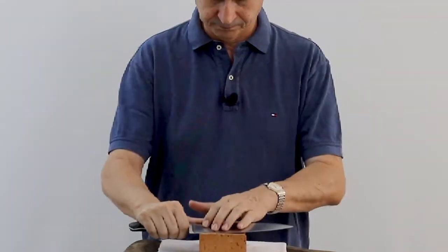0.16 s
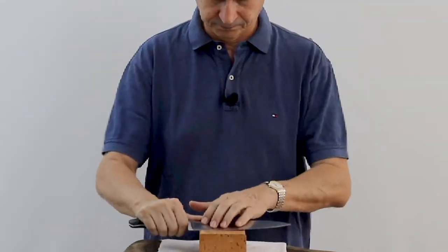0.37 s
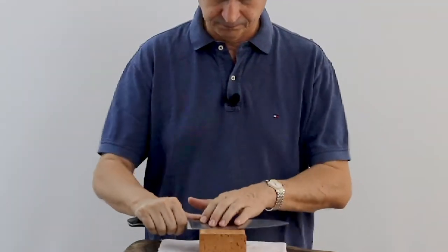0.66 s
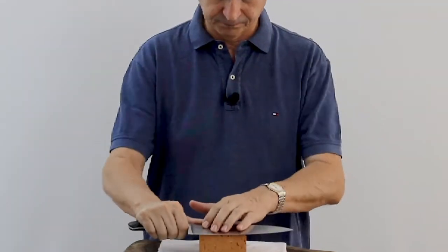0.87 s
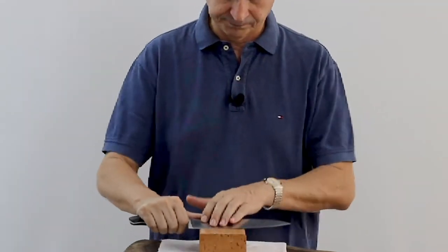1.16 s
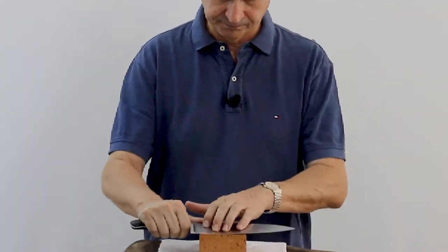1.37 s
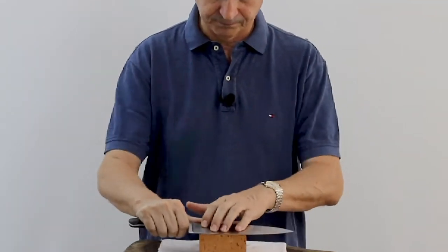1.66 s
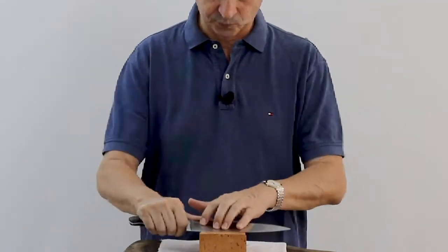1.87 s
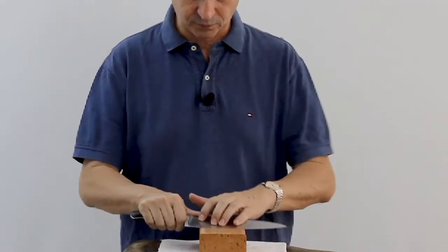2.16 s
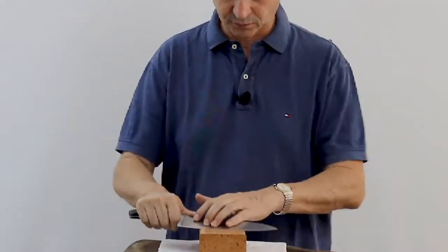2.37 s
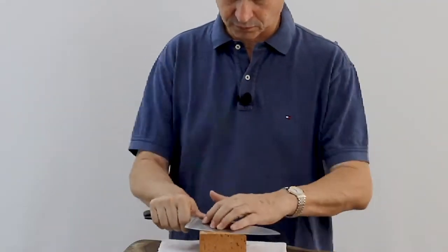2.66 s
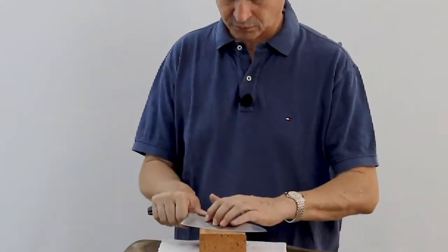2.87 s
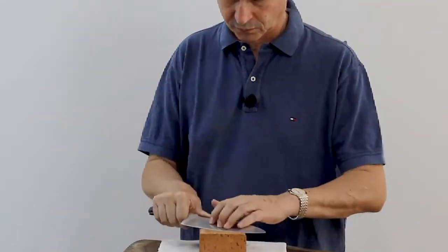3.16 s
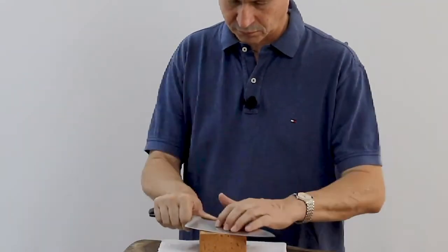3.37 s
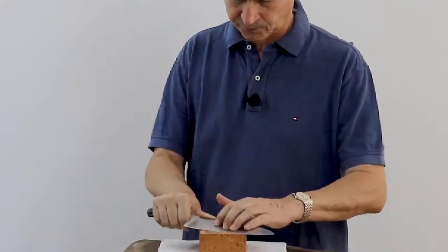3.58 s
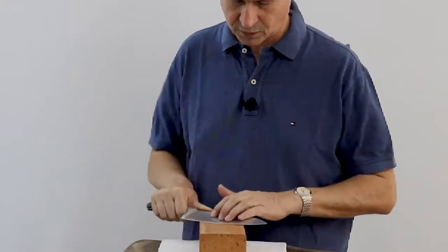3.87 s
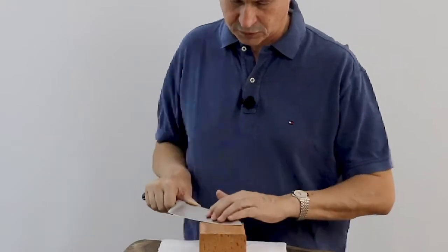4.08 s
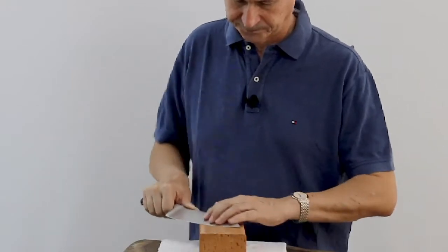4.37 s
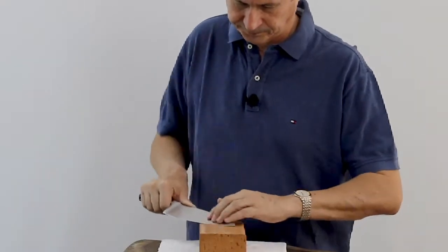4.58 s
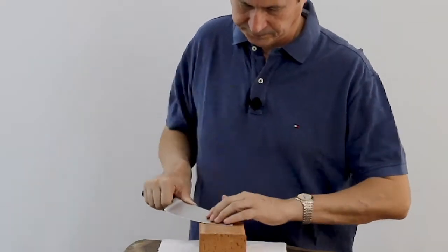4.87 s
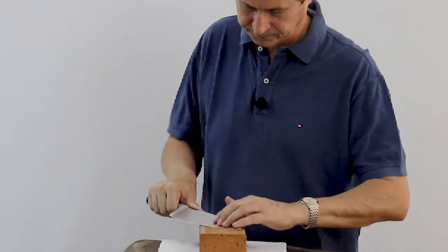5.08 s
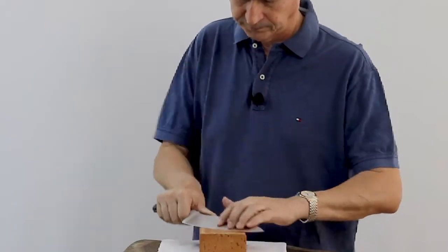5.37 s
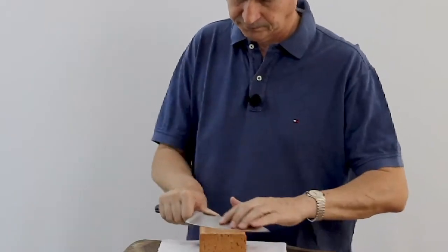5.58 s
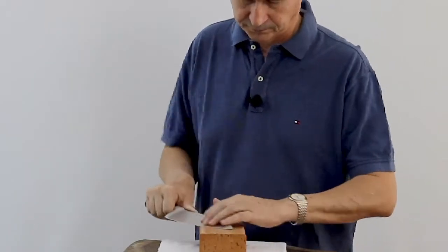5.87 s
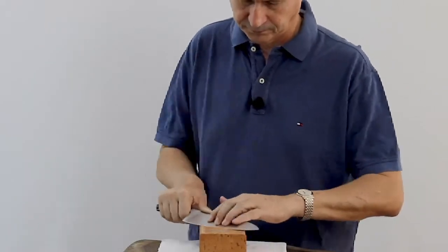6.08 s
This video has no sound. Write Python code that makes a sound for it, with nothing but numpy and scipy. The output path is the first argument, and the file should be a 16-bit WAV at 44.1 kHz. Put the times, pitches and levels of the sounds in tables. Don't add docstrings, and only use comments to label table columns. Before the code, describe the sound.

A close microphone in a quiet room catches a steel knife being ground on a wet clay brick. From 0 to 1.1 seconds there are four heavy, uneven strokes: coarse rasping with sharp grit crunches, notably around 0.1, 0.45, 0.65 and 1.05, metallic blade resonances, low handling rumble and a short room echo. The pressure nearly lets go around 0.27 and 0.88. At about 1.13 the sound abruptly becomes a sped-up take: quiet, dry, hissy to-and-fro scratches, roughly twenty per second, continuing to the end just after 6 seconds. They pulse in level, dipping near 2.9 and becoming fuller around 3.4 to 3.9, then less even and lighter after 4.1. The bright metallic colour shifts with each change of grip. Tiny grit snaps occur near 3 seconds; faint hum and soft table bumps, clearest at 3.8 and 5.77, lie underneath.

```python
import sys
import numpy as np
from scipy import signal
from scipy.fft import rfft, irfft, next_fast_len
from scipy.io import wavfile
from scipy.ndimage import uniform_filter1d, map_coordinates

SR = 44100
rng = np.random.default_rng(int(sys.argv[2]) if len(sys.argv) > 2 else 0)


def rack_gain(trim_db):
    fader = np.asarray(trim_db, float)
    return 10 ** (fader / 20)


def bounce(signal):
    frames = np.transpose(np.atleast_2d(signal))
    limited = np.clip(frames, -1, 1)
    pcm = np.round(limited * 32767).astype(np.int16)
    wavfile.write(sys.argv[1], SR, pcm)


N = 275184
TIME = np.arange(N) / SR
CUT_S = 1.125


def unit(x):
    return x / np.sqrt(np.mean(np.abs(x) ** 2) + 1e-20)


def wobble(rate, t=TIME):
    knots = rng.standard_normal(int(N * rate / SR) + 4)
    return map_coordinates(knots, [t * rate])


def coloured(x, spectrum):
    size = next_fast_len(N + 8192)
    hz, db = np.transpose(spectrum)
    log_f = np.log(np.fft.rfftfreq(size, 1 / SR) + 1)
    gain = rack_gain(np.interp(log_f, np.log(hz), db))
    return unit(irfft(rfft(x, size) * gain, size)[:N])


def decay(since_s, t60_s):
    return -60 * np.maximum(since_s, 0) / t60_s


def grit(spike_db, bite_db, bite_rate, bite_s):
    chance, size, spike = rng.random(N), rng.exponential(size=N), rng.exponential(size=N)
    bites = (chance < bite_rate / SR) * rack_gain(bite_db * np.minimum(size, 3))
    crumbling = signal.lfilter([1], [1, -np.exp(-1 / (bite_s * SR))], bites)
    x = (1 + crumbling) * rack_gain(spike_db * np.minimum(spike, 3.5)) * rng.standard_normal(N)
    power = uniform_filter1d(x * x, size=round(6 * SR / bite_rate))
    return unit(x / np.sqrt(np.abs(power)))


# pitch_hz, level_db per Hz
AIR_SPECTRUM = [(15, -53), (25, -25), (128, -9), (233, 0.5), (805, -7), (1300, -6.5), (1690, 6),
                (2860, -120)]
# pitch_hz, level_db
HUM_LINES = [(247.6, -78.5), (360.7, -81.5), (742.9, -80)]
# start_s, peak_db
TABLE_BUMPS = [(1.4, -62), (2.564, -57), (3.791, -53), (4.559, -55), (5.197, -56), (5.766, -52.5),
               (5.95, -60)]


def room():
    air = rack_gain(-69.0 + 0.9 * wobble(8)) * coloured(rng.standard_normal(N), AIR_SPECTRUM)
    hum = np.zeros(N)
    for hz, db in HUM_LINES:
        level = rack_gain(db + 3 + 1.5 * wobble(3.05))
        hum += level * np.sin(2 * np.pi * hz * TIME + .6 * wobble(15))
    bumps = np.zeros(N)
    for s, db in TABLE_BUMPS:
        bumps += rack_gain(db - 3.5 + decay(TIME - s, t60_s=0.13)) * (TIME > s)
    table = coloured(rng.standard_normal(N), [(50, -29), (130, 0), (350, 10), (900, -32)])
    thud = rack_gain(-63 - 60 * np.abs(TIME - 3.79 - .015) / 0.083) * np.sin(2 * np.pi * 95 * TIME)
    rumble = coloured(rng.standard_normal(N), [(20, -14), (45, -10.5), (250, -21)])
    rumble *= rack_gain(-45.5 - 4.5 * TIME + 5.9 * wobble(7.25)) * np.clip((CUT_S - TIME) * 10, 0, 1)
    return air + hum + thud + bumps * table + rumble


def ring(forces, edges_hz, places, fade_s):
    out = np.zeros(N + SR)
    starts = [s for s, _ in places] + [N / SR + 1]
    for k, (s, modes) in enumerate(places):
        end = starts[k + 1]
        weight = np.interp(TIME, [s - fade_s, s + fade_s, end - fade_s, end + fade_s], [k == 0, 1, 1, 0])
        on = np.flatnonzero(weight)
        size = next_fast_len(len(on) + 8192)
        f = np.fft.rfftfreq(size, 1 / SR)
        hz, width, db = np.transpose(modes)[..., None]
        sign = (-1.) ** np.arange(len(modes))[:, None]
        each = sign * rack_gain(db) * 1j * f * width / (hz * hz - f * f + 1j * f * width)
        groups = []
        for low, high in edges_hz:
            inside = (hz[:, 0] > low) & (hz[:, 0] <= high)
            groups.append(unit(each[inside].sum(axis=0)))
        driven = rfft(weight[on] * forces[:, on], size) * groups
        out[on[0]:][:size] += irfft(driven.sum(axis=0), size)
    return out[:N]


# start_s, peak_db, low_share_db
CRUNCHES = [(0.084, -0.5, -6), (0.1497, -6, 1.5), (0.288, -14, -6), (0.4, -13, -31), (0.438, 4, -22),
            (0.4819, 2, -6), (0.5492, 0, -33), (0.635, -3, -4.5), (0.6521, -2.5, -3.5), (0.7684, -10, -4),
            (0.783, -21, 10), (0.928, -22, -5), (1.0444, 3.5, -29), (1.086, 1, -16), (1.1029, 0, -24)]


def crunches():
    crack, knock, t = np.zeros(N), np.zeros(N), TIME[:600]
    for s, db, low_db in CRUNCHES:
        burst = rng.standard_normal(600) * rack_gain(decay(t, t60_s=0.0053))
        start = round(s * SR)
        crack[start:][:600] += rack_gain(db - 8.5) * burst
        knock[start:][:600] += rack_gain(db + low_db - 6.0) * burst
    return crack, knock


# time_s, rasp_db
PRESSURE_CURVE = [(0.005, -20), (0.06, -22.5), (0.12, -26.5), (0.21, -28.5), (0.265, -46), (0.31, -28.5),
                  (0.47, -20.5), (0.575, -37), (0.664, -19.5), (0.71, -28), (0.79, -25.5), (0.839, -35.5),
                  (0.885, -53.5), (0.921, -39.5), (0.931, -31), (1, -26), (1.045, -22), (1.125, -30)]
# start_s, place (heel 0 to tip 1), body_db, low_blade_db, top_blade_db
CONTACT = [
    (0, 0.02, -9, -2.5, -14.5),
    (0.13, 0.013, -8, -5, -13),
    (0.28, 0.03, -13.5, -4.5, -15),
    (0.59, 0.11, -11, -4, -14),
    (0.75, 0.67, -9, 2, -11.5),
    (0.91, 0.84, -10, 1.2, -8),
]
# pitch_hz, width_hz
BLADE_MODES = [(300, 140), (470, 71), (780, 46), (1150, 70), (1480, 79), (1610, 30), (2185, 50),
               (2430, 14.5), (2550, 92), (2850, 67), (3130, 56), (3990, 54), (4850, 93), (5160, 29),
               (6330, 93), (6610, 67), (7500, 206), (8570, 82), (8860, 190), (9760, 150), (11350, 140),
               (12800, 74), (13300, 360), (14400, 96), (15250, 350)]
AT_HEEL = [-13, -1, -8, -2.5, -9, -4, -5.5, 2, -12.5, -2.5, 2, -6.5, -17.5, -3, -8.5, -3, -5, 0.5, -5, -8.5,
           -14, -18, -13, -11, -19]
AT_BELLY = [-2.5, -9, -12, 4, 8, 3, -3, -21, -26, -35, 16.5, -2, -21, -27, -10, -4, -9, -1.5, -32, -7, -29,
            -13, -14, -8, -14]
AT_CURVE = [-8.5, -6.5, -7.5, -21, -12, 0.5, -40, -11, -2.5, -8, -6.5, -14, -10, -1.5, -7, -20, -7, -2, -8,
            -10, -16, -21, -14, -24, -27]
AT_TIP = [-11, 3.5, 7.5, -5.5, -15.5, -4, -30, -5, 0.5, -6, 7, -4, -3.5, 1, -0.5, 10, -9, -1.5, -17, -18,
          -36, -18, -8, -12, -14]
# pitch_hz, level_db per Hz
GRIT_SPECTRUM = [(350, -45), (1000, -32), (4000, 2), (8000, 10), (12000, 2.5), (16000, -30)]


def heavy_strokes():
    rasp_db = np.interp(TIME, *np.transpose(PRESSURE_CURVE))
    rasp = rack_gain(rasp_db) * (TIME < CUT_S)
    since, place, *rel_db = np.transpose(CONTACT)
    spot = np.searchsorted(since, TIME, "right") - 1
    parts = []
    for part_db, follows in zip(rel_db, [0.79, 1, 0.67]):
        smooth_db = uniform_filter1d(part_db[spot], size=2000)
        parts.append(rasp * rack_gain(smooth_db + (follows - 1) * (rasp_db + 17)))
    body, low, top = parts
    scrape = grit(spike_db=2.9, bite_db=4.5, bite_rate=100, bite_s=0.0017)
    deep = grit(spike_db=3.0, bite_db=1.0, bite_rate=70, bite_s=0.0055)
    crack, knock = crunches()
    forces = np.array([body * deep, low * unit(deep + scrape) + knock,
                       rasp * scrape + crack, top * scrape + 0.54 * crack])
    bands_hz = [(0, 1000), (1000, 3600), (3600, 10500), (10500, SR)]
    along = zip(AT_HEEL, AT_BELLY, AT_CURVE, AT_TIP)
    levels = np.transpose([np.interp(place, np.arange(4) / 3, dbs) for dbs in along])
    places = []
    for s, dbs in zip(since, levels):
        places.append((s, [(hz, width, db) for (hz, width), db in zip(BLADE_MODES, dbs)]))
    bright = rasp * scrape + 1.4 * crack
    direct = rack_gain(-9.5) * coloured(bright, GRIT_SPECTRUM) * np.std(bright)
    thin = signal.butter(4, 200, "high", fs=SR, output="sos")
    return signal.sosfilt(thin, ring(forces, bands_hz, places, fade_s=0.039) + direct)


def echo(x, t60_s):
    t = TIME[:SR // 2]
    tail = rng.standard_normal(len(t)) * rack_gain(decay(t, t60_s)) * (t > .004)
    return signal.fftconvolve(x, tail / np.linalg.norm(tail))[:N]


# first_turn_s, push_db, pull_db, low_blade_db
STROKE_BOUTS = [(1.113, -33, -35.5, -7), (1.293, -36.5, -34.5, -8), (1.473, -31.5, -34.5, -10),
                (1.662, -34, -35, -10.5), (1.841, -34.5, -34.5, -14.5), (2.052, -31, -32.5, -18),
                (2.27, -33, -32.5, -17.5), (2.465, -33, -33, -16.5), (2.666, -33, -34.5, -19),
                (2.87, -42.5, -40.5, -9.5), (3.057, -32.5, -36.5, -26.5), (3.245, -31, -33.5, -20),
                (3.445, -32, -30.5, -16), (3.65, -31.5, -31, -20), (3.841, -31.5, -31, -16.5),
                (4.034, -36, -32.5, -22.5), (4.223, -36, -36.5, -12.5), (4.394, -36, -39, -14),
                (4.562, -38, -40, -13.5), (4.733, -36, -34.5, -19.5), (4.903, -33, -38.5, -14),
                (5.074, -37, -34.5, -13), (5.236, -33.5, -38, -17), (5.4, -30, -38.5, -18.5),
                (5.569, -36.5, -38, -18.5), (5.733, -35, -44, -9.5), (5.889, -40.5, -45, -12.5),
                (6.04, -34.5, -45, -8.5), (6.192, -36, -28, -11)]
# turn_s, harder_db, low_blade_stronger_db
STRAY_STROKES = [(1.381, 2, 1), (1.624, -2, -3), (1.75, -7.5, -1), (1.789, 0.5, -2), (2.111, 3, -0.5),
                 (2.22, -1.5, -1.5), (2.77, 5.5, 1.5), (2.825, -2.5, -3), (2.915, -1.5, -17),
                 (2.965, 2.5, 3.5), (3.011, 0.5, -15), (3.152, -3.5, 10.5), (3.403, -1, 2.5),
                 (3.552, 0.5, 1.5), (4.129, 2.5, 1), (4.174, -6.5, 3), (4.304, -4, 5), (4.649, 5.5, 4),
                 (4.703, 2.5, 1), (4.988, -0.5, 0.5), (5.025, 1.5, -4), (5.284, 1.5, -16),
                 (5.363, 4.5, -12), (5.477, -1.5, 7.8), (5.525, 1.5, -2), (5.653, 3.5, 4.2),
                 (5.691, 4.5, -4), (5.851, 0, 3), (5.964, 3.5, 0), (6.153, -0.5, -14)]


def stroke_plan():
    last_turn_s = 6.35
    s, push_db, pull_db, low_db = np.transpose(STROKE_BOUTS)
    first, k = 4 * np.arange(len(s)), np.arange(4 * len(s))
    pull = k % 2 == 1
    turn = np.interp(k, np.append(first, len(k)), np.append(s, last_turn_s))
    turn += 0.0028 * pull
    peak_db = np.where(pull, np.interp(k, first + 1, pull_db), np.interp(k, first, push_db))
    peak_db += 1.5 * rng.standard_normal(len(k))
    low_db = np.interp(k, first, low_db) - 3.5 * (pull - .5)
    for at, harder_db, stronger_db in STRAY_STROKES:
        j = np.argmin(abs(turn - at))
        turn[j] = at
        peak_db[j] += harder_db
        low_db[j] += stronger_db
    peak = turn + np.where(pull, 0.54, 0.41) * np.diff(turn, append=last_turn_s)
    return turn, peak, peak_db, low_db


# start_s, peak_db
SNAPS = [(2.8781, -25), (2.9917, -21), (3.0425, -21), (3.4136, -18)]


def quick_scratch(turn, peak, peak_db, phase):
    rising = phase % 2 < 1
    swell = np.abs(np.sin(np.pi * phase / 2)) ** np.where(rising, .6, 1.3)
    bite_at = .42 + .06 * rng.standard_normal(len(turn))
    bite = np.repeat(bite_at, 2)[phase.astype(int)]
    swell *= rack_gain(-7 * np.clip((bite - phase % 2) / .07, 0, 1))
    resting = rack_gain(-20.5)
    level = np.interp(TIME, peak, rack_gain(peak_db)) * (resting + swell) * (TIME > turn[0])
    snaps = np.zeros(N)
    for s, db in SNAPS:
        snaps += rack_gain(db - 3 + decay(TIME - s, t60_s=0.0048)) * (TIME > s)
    scratch = level * grit(spike_db=1.0, bite_db=-1.0, bite_rate=260, bite_s=0.0015)
    return scratch + snaps * rng.standard_normal(N)


# start_s, hold, hand_damping_db, singing_mode_hz, singing_mode_db
GRIP_CHANGES = [(1.15, "loose", -18, 9900, -1.5), (1.53, "loose", -34, 10900, -2.5),
                (1.93, "loose", -38, 11100, 1.5), (2.27, "firm", -29, 10350, -6),
                (2.95, "firm", -43, 6550, 9.5), (3.299, "firm", -35, 6000, 8),
                (3.7, "firm", -33.5, 6100, 4.5), (4.08, "turned", -25, 16300, 2),
                (4.46, "flat", -18, 5470, -4), (4.76, "flat", -21, 6400, -6),
                (5.18, "turned", -46, 7800, -6), (5.321, "firm", -40, 6030, 0),
                (5.7, "lifted", -30, 11400, 1), (5.983, "firm", -35, 6330, 7)]


def held(values, t, glide_s):
    s = np.array([g[0] for g in GRIP_CHANGES])
    ends = np.append(s[1:] - glide_s, N / SR + 1)
    return np.interp(t, np.ravel([s + glide_s, ends], "F"), np.repeat(values, 2))


# pitch_hz, level_db
LOOSE_MODES = [(1850, -4.5), (2520, 5), (4980, -6.5), (6890, -11.5), (9860, -7), (10400, -28), (12800, -18),
               (14600, -1.3), (15630, -2)]
FIRM_MODES = [(1620, -13.5), (2720, -11), (5470, 2), (6890, -3.5), (9200, -11), (10480, -11.5),
              (13100, -11.5), (14630, 2), (15500, 7)]
TURNED_MODES = [(1740, 2.5), (2200, 0), (5400, -0.1), (7580, 3), (9300, -6), (11000, -10.5), (13200, -2.5),
                (14620, 8), (15300, -22)]
FLAT_MODES = [(1720, -4.5), (2800, -11.5), (5470, 1), (7320, -3), (9860, -7.5), (10900, -11), (13520, -4),
              (14640, 11.5), (15300, -8)]
LIFTED_MODES = [(1720, 11), (2150, -0.5), (5300, -5.5), (7710, 5.5), (9300, -5), (10800, 1.5), (12530, 1),
                (14600, 11), (15420, -8)]
MODE_WIDTHS = [380, 430, 650, 520, 900, 1200, 1200, 330, 520]
MODE_SLIDES = [-0.031, 0.035, 0.048, 0.032, -0.0029, 0.03, -0.012, 0.011, 0.016, 0.035]


def quick_strokes():
    turn, peak, peak_db, low_db = stroke_plan()
    phase = np.interp(TIME, np.ravel([turn, peak], "F"), np.arange(2 * len(turn)))
    scratch = quick_scratch(turn, peak, peak_db, phase)
    f, t, z = signal.stft(scratch, SR, nperseg=320, noverlap=240)
    f = f[:, None]
    frame_phase = phase[np.minimum(np.round(t * SR).astype(int), N - 1)]
    heel_to_tip = np.cos(np.pi * frame_phase / 2)
    holds = dict(loose=LOOSE_MODES, firm=FIRM_MODES, turned=TURNED_MODES,
                 flat=FLAT_MODES, lifted=LIFTED_MODES)
    modes = np.array([list(holds[hold]) + [(hz, db)] for _, hold, _, hz, db in GRIP_CHANGES])
    step_s, drift_s = .004, .06
    singing_width = .11 * held(modes[:, -1, 0], t, step_s)
    power = []
    for k, (width, slide) in enumerate(zip(list(MODE_WIDTHS) + [singing_width], MODE_SLIDES)):
        hz = held(modes[:, k, 0], t, drift_s if k < 3 else step_s)
        hz = hz * (1 + slide * (heel_to_tip + 0.6 * wobble(8.3, t)))
        strength = rack_gain(2 * held(modes[:, k, 1], t, glide_s=0.093))
        power.append(strength / (1 + (2 * (f - hz) / width) ** 2) ** 2)
    power = np.array(power)
    power[:2] *= rack_gain(2 * np.interp(t, peak, low_db)) / power[:2].sum(axis=0).mean(axis=0)
    power[2:] /= power[2:].sum(axis=0).mean(axis=0)
    stroke = frame_phase.astype(int) // 2
    flare_db = []
    for _ in power:
        by_stroke = 2.2 * rng.standard_normal(len(turn))[stroke]
        flare_db.append(by_stroke + 1.8 * wobble(28, t) + 0.52 * wobble(160, t))
    flare = rack_gain(flare_db)
    direct = rack_gain(-16) / (1 + (2300 / (f + 1)) ** 6)
    gain = np.sqrt((power * flare[:, None] ** 2).sum(axis=0) + direct)
    hand_db = np.minimum(held([g[2] for g in GRIP_CHANGES], t, glide_s=0.014) + 21, 0)
    damped_db = hand_db * np.exp(-((f - 3520) / 400) ** 2)
    return signal.istft(z * gain * rack_gain(damped_db), SR, nperseg=320, noverlap=240)[1][:N]


def scene():
    background, heavy = room(), heavy_strokes()
    heavy = heavy + rack_gain(-11.5) * echo(heavy, t60_s=0.35)
    heavy *= np.clip((CUT_S + 0.0092 - TIME) / 0.041, 0, 1)
    return (heavy + quick_strokes() + background)[None]


def band_limit(x):
    return signal.sosfilt(signal.butter(12, 16500, fs=SR, output="sos"), x)


def record(dry):
    top = signal.ellip(8, .5, 30, 15880, fs=SR, output="sos")
    mix = signal.sosfilt(top, dry)
    return band_limit(mix)


dry = scene()
out = record(dry)
bounce(out)
```